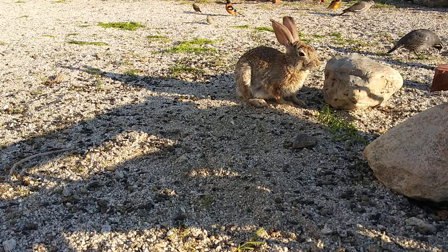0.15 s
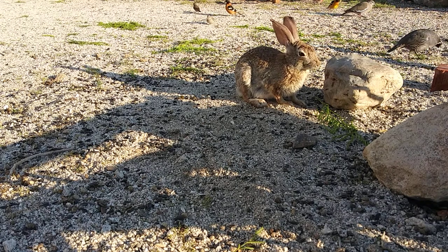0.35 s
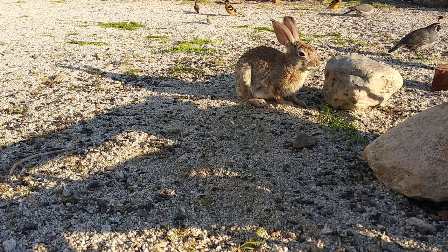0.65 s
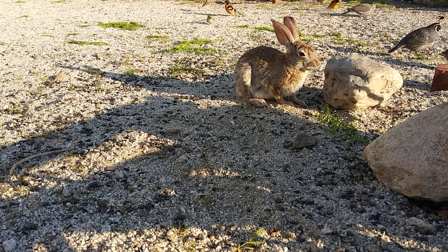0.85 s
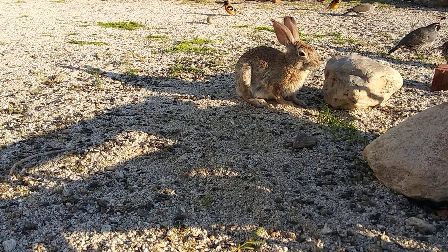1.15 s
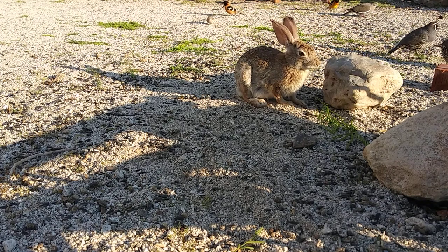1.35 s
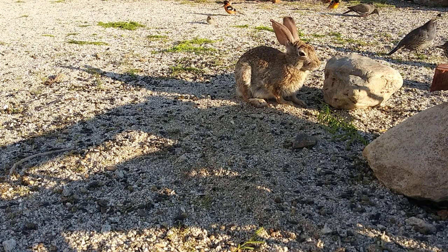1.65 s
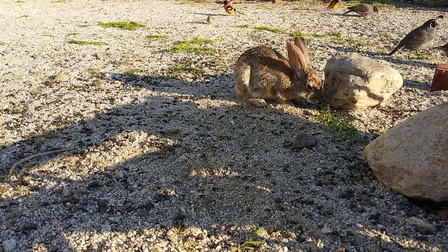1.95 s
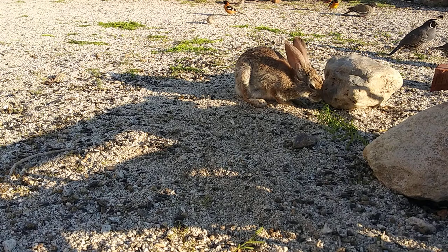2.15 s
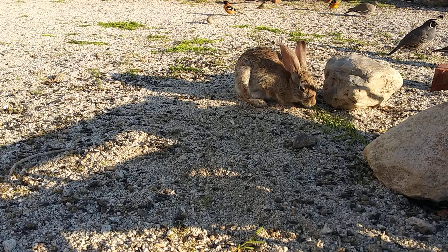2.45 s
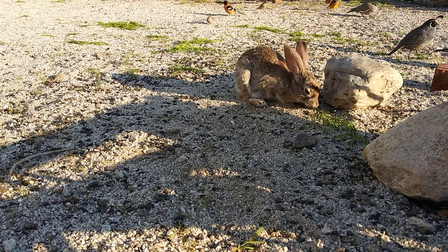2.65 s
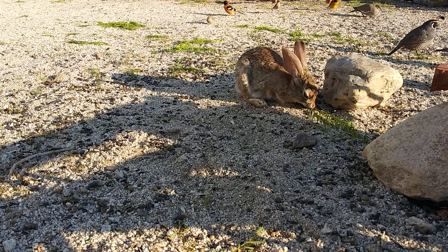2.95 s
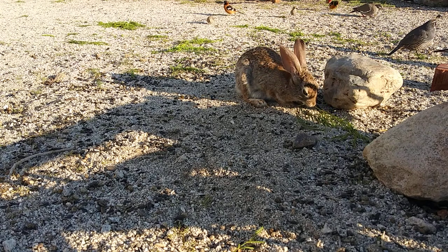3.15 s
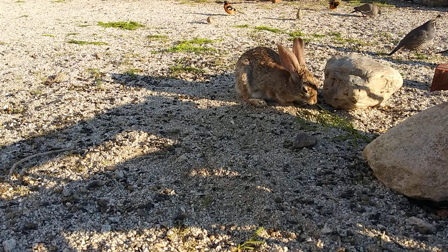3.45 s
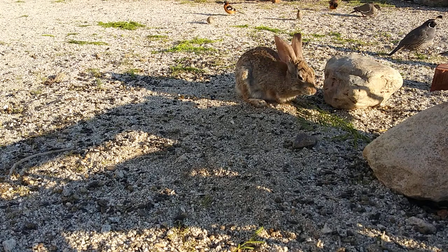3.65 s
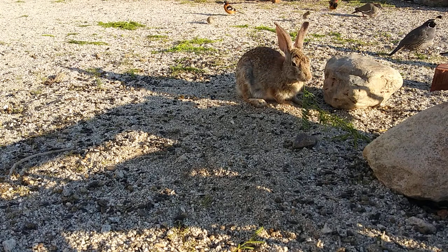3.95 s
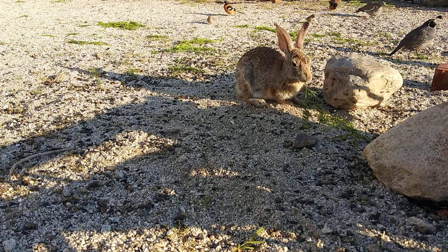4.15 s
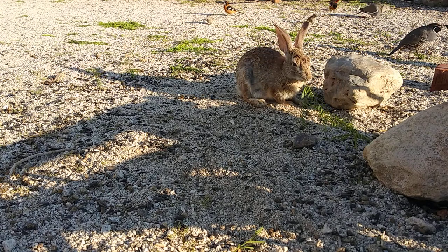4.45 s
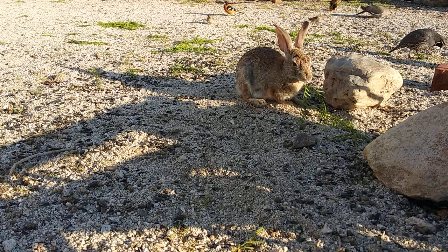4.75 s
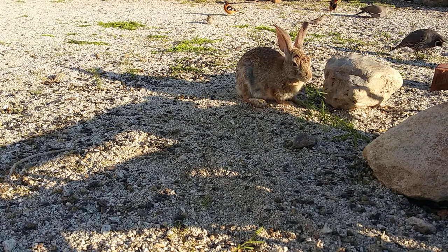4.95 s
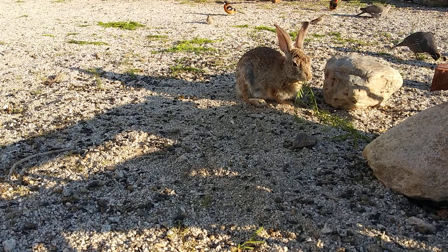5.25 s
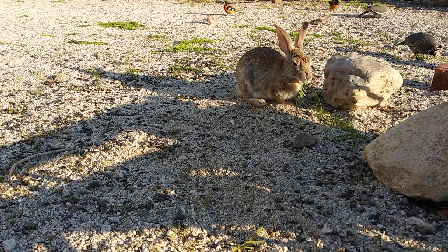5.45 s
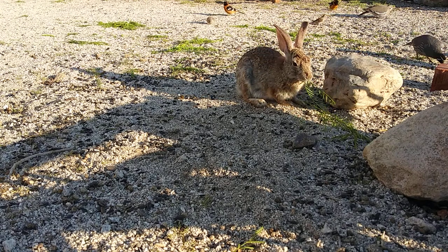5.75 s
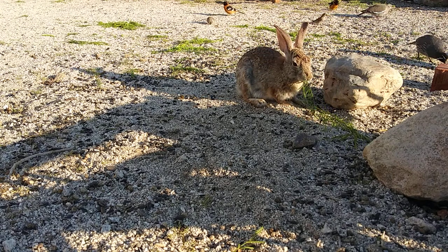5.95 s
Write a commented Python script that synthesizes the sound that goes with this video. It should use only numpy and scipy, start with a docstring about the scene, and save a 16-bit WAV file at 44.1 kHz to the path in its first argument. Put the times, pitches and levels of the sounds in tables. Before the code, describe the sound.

Hoarse, breathy quail whistles over light air rumble give way to soft distant calls, crisp beak cracks and two loud hollow hoots.

```python
"""Quail call in a gravel backyard, over a quiet floor with a faint hum; small birds chirp and beaks crack seeds.
First a hoarse bird whistles gliding notes that choke into hiss, while light air rumbles and dies down.
From about two seconds softer notes come from farther off, among chirps, thin whistles and cracks.
Then a loud bird calls twice; a wall throws its notes back, so each glide beats against its own echo.
Right after its second call another quail answers, softer. Voices are harmonics of a pitch arch; the rest is noise."""
import sys
import numpy as np
from scipy import signal
from scipy.fft import rfft, irfft, next_fast_len
from scipy.io import wavfile

SR = 44100
rng = np.random.default_rng(int(sys.argv[2]) if len(sys.argv) > 2 else 0)


def store_wav(level_fs):
    """Save 16-bit WAV to argv[1]."""
    pcm = np.round(np.clip(np.atleast_2d(level_fs), -1, 1) * 32767)
    wavfile.write(sys.argv[1], SR, pcm.T.astype(np.int16))


N = 269002  # length in samples
TIME = np.arange(N) / SR
EDGE_HZ = 16300  # upper band limit
FOOT_HZ = 439.4  # where the arches of the clear quail voices start and end


def amp(db):
    """Decibels to gain."""
    return 10 ** (np.asarray(db) / 20)


def unit(x):
    """Scales to rms 1."""
    return x / np.sqrt(np.mean(x ** 2) + 1e-20)


def read(points, hz):
    """A spectrum's gain, joined by straight lines on a log-frequency axis."""
    point_hz, point_db = np.transpose(points)
    return amp(np.interp(np.log(hz + 1), np.log(point_hz), point_db))


def add(mix, start_s, sound):
    """Mixes a sound in at a given time, trimming what falls outside."""
    at = round(start_s * SR)
    part, sound = mix[max(at, 0):], sound[max(-at, 0):]
    part[:len(sound)] += sound[:len(part)]


def noise(colour, size):
    """Noise of rms 1 with the given spectrum."""
    n = next_fast_len(size, True)
    spectrum = rfft(rng.standard_normal(n)) * read(colour, np.fft.rfftfreq(n, 1 / SR))
    return unit(irfft(spectrum, n)[:size])


def band(hz, width_hz, size):
    """Noise of rms 1 in a bell-shaped band; around 0 Hz it is a slow random drift."""
    n = next_fast_len(size, True)
    bell = np.exp(-.5 * ((np.fft.rfftfreq(n, 1 / SR) - hz) / width_hz) ** 2)
    return unit(irfft(rfft(rng.standard_normal(n)) * bell, n)[:size])


def echo(x, delay_s, strength):
    """The sound plus one reflection: a delay is a turn of phase that grows with frequency."""
    size = next_fast_len(len(x) + SR // 20)
    turn = np.exp(-2j * np.pi * np.fft.rfftfreq(size, 1 / SR) * delay_s)
    return irfft(rfft(x, size) * (1 + strength * turn), size)


def yard(x, wet_db, t60):
    """Weak scattered reflections from rocks, fence and shrubs: noise that fades 60 dB in t60 seconds."""
    t = np.arange(SR // 2) / SR
    tail = rng.standard_normal(len(t)) * amp(-60 * t / t60) * (t > .005)
    return x + amp(wet_db) * signal.fftconvolve(x, tail / np.linalg.norm(tail))[:N]


def arch(foot_hz, top_s, rise_s, fall_s, top_hz, rise_shape=1, fall_shape=1, crown=0):
    """Pitch lifts from its foot to a top and sinks back. Gives start, pitch and lift (0-1)."""
    t = np.arange(-rise_s, fall_s, 1 / SR)
    away = np.where(t < 0, -t / rise_s, t / fall_s)
    # shape 1 is a bell, less is pointed, more is flat-topped
    lift = np.cos(np.pi / 2 * away ** np.where(t < 0, rise_shape, fall_shape)) ** 2
    # a crown rounds a flat top
    lift *= 1 - np.clip(crown, 0, 1) * away * np.sqrt(away)
    return top_s - rise_s, foot_hz + (top_hz - foot_hz) * lift, lift


def note(hz, db, throat, jitter, shimmer, edge_power=1, flutter_db=5.3, overtone_db=0,
         air=None, air_db=-70, air_power=3, count=14):
    """Harmonics of a gliding pitch sweep through a fixed throat; straining for the top adds roughness and edge."""
    t = np.arange(len(hz)) / SR
    strain = hz / hz.max()
    rough_hz = hz * (1 + jitter * strain ** 3 * band(0, 216, len(t)))
    turns = np.cumsum(rough_hz) / SR
    tone = np.zeros(len(t))
    for k in range(1, count):
        gain = amp(overtone_db * (k > 1)) * read(throat, k * hz) * (k * hz < EDGE_HZ)
        # the upper partials come and go with the strain, and flutter
        if k > 4:
            gain = gain * strain ** edge_power * amp(flutter_db * band(0, 46, len(t)))
        tone += gain * np.cos(2 * np.pi * k * turns)
    tone *= amp(db) * (1 + shimmer * band(0, 120, len(t)))
    if air:
        # breath hiss, also strongest at the top
        tone += amp(air_db) * strain ** air_power * noise(air, len(t))
    return tone * np.clip(np.minimum(t, t[-1] - t) / 0.0058, 0, 1)


# Colour of the quiet floor: pitch_hz, relative level_db
FLOOR_COLOUR = [(24, -57), (40, -18), (87, -13), (101, -24), (124, -9), (151, -8.5), (297, -6.5),
                (570, -12.5), (733, -15), (3380, -21), (6020, -26.5), (8340, -19.5), (16000, -25)]
FLOOR_DB = -67.5
HUM_HZ, HUM_DB, HUM_WAVER = 120, -81, 1.3  # waver: narrow noise around the hum, relative to it


def background():
    """A steady floor of coloured noise and a far-off hum, a pure tone that wavers with narrow noise around it."""
    hum = unit(np.sin(2 * np.pi * HUM_HZ * TIME)) + HUM_WAVER * band(HUM_HZ, 7.5, N)
    return amp(FLOOR_DB) * noise(FLOOR_COLOUR, N) + amp(HUM_DB) * hum


# How the rumble of the light air rises and falls: time_s, level_db
BREEZE_LEVEL = [(0, -67.5), (.35, -71.5), (.55, -69.5), (.75, -68.5), (1.0, -70), (1.15, -75.5),
                (1.65, -78), (1.9, -99)]
# Colour of that rumble: pitch_hz, relative level_db
RUMBLE_COLOUR = [(20, -30), (45, -14), (70, -9), (120, -17.5), (200, -22.5), (400, -42)]
# Low bumps of air on the microphone: start_s, level_db, pitch_hz
AIR_BUMPS = [(0.025, -50, 88), (.058, -55, 80), (0.27, -39.5, 131), (.309, -37.5, 99), (0.463, -45, 73),
             (0.674, -52.5, 90), (0.866, -39.5, 91), (0.954, -51.5, 91.5), (5.86, -62, 90.5)]


def breeze():
    """Light air rumbles on the microphone and dies down; each puff is a quickly damped low swing."""
    time_s, rumble_db = np.transpose(BREEZE_LEVEL)
    out = amp(np.interp(TIME, time_s, rumble_db, right=-110)) * noise(RUMBLE_COLOUR, N)
    t = np.arange(SR // 10) / SR
    swell = t / 0.0045 * np.exp(1 - t / 0.0036)
    for start_s, level_db, hz in AIR_BUMPS:
        add(out, start_s, amp(level_db) * swell * np.sin(2 * np.pi * hz * t))
    return out


# Colour of ticks and cracks, with the microphone's bright peak near 8900 Hz: pitch_hz, relative level_db
CLICK_COLOUR = [(300, -30), (1500, -41), (3200, -35), (4700, -31.5), (6000, -21.5), (7000, -26),
                (8000, -0.5), (8900, 6), (10500, -7), (13000, -11), (16000, -36)]


def gravel(per_s=14, peak_db=-60, spread_db=3):
    """Faint ticks of feet and beaks among the stones: random single clicks, the stronger ones rarer."""
    chance = rng.random(N)
    size = np.minimum(rng.exponential(1, N), 3)
    ticks = (chance < per_s / SR) * amp(peak_db + spread_db * size)
    n = next_fast_len(N, True)
    colour = read(CLICK_COLOUR, np.fft.rfftfreq(n, 1 / SR))
    return irfft(rfft(ticks, n) * colour / colour.mean(), n)[:N]


# Beaks cracking seeds: start_s, level_db (peak before the echoes), peak_hz (the bright peak),
# tilt in dB per octave above the bright peak, knock_db (the dull knock below it)
SEED_CRACKS = [(0.0713, -46, 8750, 2, 2), (0.5236, -24, 9100, 15.5, 16), (0.99, -40, 8850, -6, 15),
               (2.746, -41.5, 8100, 10, 6), (2.8096, -35.5, 8900, 12, 10), (2.9258, -26, 8320, 13, 18),
               (3.0184, -11.5, 9040, 6, 1.5), (3.1232, -46, 8870, -3, 0), (3.3110, -39.5, 8200, 12, 9),
               (3.436, -50, 9000, 0, 0), (3.6735, -35.5, 9300, 13, 5), (4.1432, -28.5, 9600, -12, 0),
               (4.1856, -38, 8500, 11, 7), (4.4342, -49, 9000, 0, 0), (4.6749, -32.5, 9000, 0, 15.5),
               (4.7142, -32.5, 8900, -10, 12), (4.734, -28, 8800, 15, 16.5), (5.0342, -26, 8600, -5, 3),
               (5.2688, -20, 9100, 1, 0), (5.444, -43, 8250, 7, 14), (5.8703, -37, 8400, -8, 10)]
SCUFF_HZ, SCUFF_DB, SCUFF_S = 1400, -47, 0.013  # dull scuff: centre, level relative to the crack, fade time


def seeds(size=2048):
    """Each husk snaps once and sheds a few splinters; the ground and the wall repeat the snap."""
    out = np.zeros(N)
    t, f = np.arange(size) / SR, np.fft.rfftfreq(size, 1 / SR)
    lead = size // 8  # samples of room before the snap
    for start_s, level_db, peak_hz, tilt_db, knock_db in SEED_CRACKS:
        crunch = 0.064 * np.exp(-t / 0.00063) + 0.023 * np.exp(-t / 0.0015) + 0.0046 * np.exp(-t / 0.0091)
        splinters = 0.06 * np.exp(-t / 0.023) * (rng.random(size) < 300 / SR)
        snap = (t == 0) + (crunch + splinters) * rng.standard_normal(size)

        tilt = tilt_db * np.log2(np.maximum(f / peak_hz, 1))
        knock = knock_db * np.interp(f / peak_hz, [.75, .92], [1, 0])
        colour = read(CLICK_COLOUR, f * 8900 / peak_hz) * amp(tilt + knock)
        crack = irfft(rfft(np.roll(snap, lead)) * colour)
        crack /= abs(crack).max()
        from_ground = echo(crack, 0.0009, 0.062)
        from_wall = echo(from_ground, 0.015, 0.14)
        add(out, start_s - lead / SR, amp(level_db) * from_wall)

        scuff = np.exp(-t / SCUFF_S) * band(SCUFF_HZ, 680, size)
        add(out, start_s, amp(level_db + SCUFF_DB) * scuff)
    return out


# Throat of the small birds: pitch_hz, gain_db
SMALL_THROAT = [(3000, -5.5), (4200, -1), (6000, -8.5), (7200, -13), (8200, -1.5), (11000, -9.5),
                (13000, -13), (16000, -21)]
# Twisting chirps: swing_start_s, swing_period_s, top_hz, dip in octaves, sag in octaves per swing,
# level_db, overtone_db
TWISTING_CHIRPS = [(1.574, 0.05, 4120, .45, .16, -57, 1.5), (2.525, 0.048, 3550, .7, 0.36, -60.5, -21)]
CHIRP_LEAD, CHIRP_SWINGS = .5, 1.22  # periods held before the swing, periods swung
CHIRP_FADE_DB = -1  # change of level at the ends
# Thin distant whistles: top_s, rise_s, fall_s, top_hz, bend_hz, level_db
THIN_WHISTLES = [(1.638, 0.011, 0.019, 4150, 200, -66), (2.1, .07, .15, 3600, 728, -74),
                 (2.25, .05, .17, 2890, 130, -74), (2.06, .16, .05, 8250, 150, -80),
                 (2.13, .03, .14, 8800, 375, -75), (2.35, 0.059, .1, 8560, 180, -73),
                 (2.952, 0.021, .018, 2940, 330, -72), (3.125, .018, .018, 2830, 120, -72),
                 (3.35, 0.023, 0.02, 2940, 130, -70), (3.9, .17, .05, 8400, 392, -74),
                 (4.11, 0.02, .022, 2940, 130, -67), (4.295, 0.014, 0.044, 7300, 200, -65),
                 (4.582, 0.02, .014, 3010, 297, -67), (5.59, .03, 0.041, 4190, 340, -63.5),
                 (5.675, 0.046, 0.064, 3970, 298, -65.5), (5.926, 0.051, 0.06, 4190, 60, -66.5),
                 (6.076, 0.053, 0.08, 4130, 30, -63.5)]
WHISTLE_FADE_DB = -6.5  # change of level at the ends
# Short raspy chips: start_s, length_s, centre_hz, level_db (rms over the whole chip, fades included)
RASPY_CHIPS = [(0.431, 0.04, 4300, -69), (0.644, 0.048, 4600, -67), (0.866, 0.058, 5060, -70),
               (0.945, 0.027, 5040, -67), (3.332, 0.041, 5450, -72), (4.552, 0.054, 4530, -69),
               (5.584, .025, 4400, -65), (5.917, 0.044, 4780, -63)]


def small_birds():
    """Chirps swing in pitch and echo, whistles are single bent tones, and chips are short bands of noise."""
    out = np.zeros(N)
    for swing_s, period_s, top_hz, dip, sag, level_db, overtone_db in TWISTING_CHIRPS:
        swing = np.maximum(np.arange(-CHIRP_LEAD, CHIRP_SWINGS, 1 / (period_s * SR)), 0)
        hz = top_hz * 2 ** (-dip * np.sin(np.pi * swing) ** 2 - sag * swing)
        db = level_db + CHIRP_FADE_DB * np.linspace(-1, 1, len(hz)) ** 2
        chirp = note(hz, db, SMALL_THROAT, jitter=0.019, shimmer=0.46, overtone_db=overtone_db, count=5)
        add(out, swing_s - CHIRP_LEAD * period_s, echo(chirp, .012, 0.25))
    for top_s, rise_s, fall_s, top_hz, bend_hz, level_db in THIN_WHISTLES:
        start_s, hz, lift = arch(top_hz - bend_hz, top_s, rise_s, fall_s, top_hz)
        db = level_db + WHISTLE_FADE_DB * (1 - lift)
        add(out, start_s, note(hz, db, SMALL_THROAT, jitter=0.0032, shimmer=0.38, count=2))
    for start_s, length_s, hz, level_db in RASPY_CHIPS:
        size = int(length_s * SR)
        rasp = band(hz, 750, size) + 1.02 * band(hz * 1.75, 800, size)
        add(out, start_s, amp(level_db) * unit(rasp * np.hanning(size)))
    return out


# Throat of the distant quail: pitch_hz, gain_db
COVEY_THROAT = [(400, 4.5), (1000, -9), (1300, -23), (1600, -20), (1950, -10.5), (2400, -25), (2900, -20.5),
                (4000, -13), (5000, -26), (5800, -12.5), (7000, -36)]
# Soft notes of the covey: top_s, rise_s, fall_s, top_hz, rise_shape, fall_shape, level_db at the top
COVEY_NOTES = [(1.959, 0.016, .052, 606, 0.81, 0.85, -65.5), (3.64, 0.29, 0.11, 736, 1.25, 1.04, -65.5),
               (4.304, 0.047, .045, 695, 1.48, 2.2, -64), (4.71, 0.35, 0.13, 985, 0.94, 2, -57),
               (5.001, 0.049, 0.12, 910, 0.91, 0.84, -56.5), (5.451, .061, 0.042, 947, 1.1, 1.14, -52),
               (5.755, .215, .05, 1062, 1.2, 3.23, -52.5), (6.019, 0.039, 0.16, 1015, 1.05, 0.7, -54)]
FAR_SWELL_DB = 17  # level gained per octave
# Low clucks: top_s, rise_s, fall_s, top_hz, level_db at the top
LOW_CLUCKS = [(5.244, .02, 0.0277, 425, -63.5), (5.865, 0.013, 0.033, 472, -56.5)]
CLUCK_FOOT, CLUCK_FADE_DB = 0.647, -12  # share of the top pitch, and change of level, at the ends


def covey():
    """Distant arched notes and low clucks, each a few harmonics that swell towards the top of the arch."""
    out = np.zeros(N)
    for *shape, level_db in COVEY_NOTES:
        start_s, hz, _ = arch(FOOT_HZ, *shape)
        db = level_db + FAR_SWELL_DB * np.log2(hz / hz.max())
        call = note(hz, db, COVEY_THROAT, jitter=.0033, shimmer=0.21, overtone_db=-1.5, count=4)
        add(out, start_s, call)
    for top_s, rise_s, fall_s, top_hz, level_db in LOW_CLUCKS:
        start_s, hz, lift = arch(CLUCK_FOOT * top_hz, top_s, rise_s, fall_s, top_hz)
        db = level_db + CLUCK_FADE_DB * (1 - lift)
        cluck = note(hz, db, COVEY_THROAT, jitter=.004, shimmer=0.39, overtone_db=-1, count=4)
        add(out, start_s, cluck)
    return out


# The one answering note: top_s, rise_s, fall_s, top_hz, rise_shape, fall_shape
ANSWER_NOTE = (5.903, .119, .289, 985, 1.97, 1.22)
# Throat of the answering bird: pitch_hz, gain_db
ANSWERING_THROAT = [(600, -27), (1000, -16.5), (1500, -16), (1950, 0), (2300, -7.5), (3000, -24),
                    (4200, -35), (5500, -22), (7000, -40), (9000, -25.5)]
ANSWER_DB, ANSWER_SWELL_DB = -49, 24  # level at the top, level gained per octave


def answering_quail():
    """One softer note whose voice swells with its pitch, so it is loudest at its top."""
    out = np.zeros(N)
    start_s, hz, _ = arch(FOOT_HZ, *ANSWER_NOTE)
    db = ANSWER_DB + ANSWER_SWELL_DB * np.log2(hz / hz.max())
    call = note(hz, db, ANSWERING_THROAT, jitter=0.0032, shimmer=0.19, edge_power=3, flutter_db=6, count=7)
    add(out, start_s, call)
    return out


# The hoarse bird says short, long, falling, twice, with a low note between: top_s, rise_s, fall_s, top_hz,
# rise_shape, fall_shape, level_db at the break pitch before choking, hiss_db at the top, cut_s off the end
HOARSE_CALLS = [(.008, .04, 0.061, 1057, 1.04, 0.93, -40, -54.5, 0),
                (.27, 0.2, .118, 1270, 0.93, 1.65, -42.5, -62.5, .008),
                (.541, 0.034, .3, 1087, 1.03, 0.7, -40.5, -67.5, 0.096),
                (.782, .035, .02, 629, 1.01, 2, -46.5, -82, 0.0059),
                (1.196, 0.038, 0.045, 1051, 1.32, 0.85, -40.5, -58.5, 0),
                (1.452, .215, .124, 1230, .75, 1.6, -43, -63, 0.0068),
                (1.727, .038, 0.26, 1098, 0.91, 0.56, -44.5, -68, 0.082)]
# Its throat: pitch_hz, gain_db
HOARSE_VOICE = [(500, -4), (800, -10.5), (1050, -7), (1300, -5.5), (1600, 1.5), (1850, 2.5), (2050, -10),
                (2300, -11), (3100, -26), (4300, -43), (5700, -11.5), (6800, -40), (8000, -12.5),
                (9500, -32.5)]
# The air hissing through it: pitch_hz, relative level_db
HOARSE_HISS = [(100, -45), (500, -4), (1200, -12), (2200, -5), (3000, -8), (4600, -18.5), (5700, 9),
               (6800, -10), (8000, 3.5), (9200, -21), (15000, -26)]
HOARSE_FOOT_HZ, HOARSE_SWELL_DB = 523.3, 21.5  # where its arches start and end; level gained per octave
BREAK_HZ, BREAK_WIDTH_HZ, BREAK_DB = 1043, 50, -14.5  # above this pitch the voice chokes
RASP_HZ, RASP_WIDTH_HZ, RASP_DB = 2070, 330, -24  # noise of the choked voice, relative to level_db
HOARSE_TIRE_DB = -3.5  # the fall is softer than the rise
HOARSE_RELEASE_S = 0.0092


def hoarse_quail():
    """The voice swells as it climbs, chokes into hiss above its break, and tires on the way down."""
    out = np.zeros(N)
    for *shape, level_db, hiss_db, cut_s in HOARSE_CALLS:
        start_s, hz, _ = arch(HOARSE_FOOT_HZ, *shape)
        t = np.arange(len(hz)) / SR
        choke = .5 + .5 * np.tanh((hz - BREAK_HZ) / BREAK_WIDTH_HZ)
        falling = t > t[hz.argmax()]
        swell_db = HOARSE_SWELL_DB * np.log2(hz / BREAK_HZ)
        db = level_db + swell_db + BREAK_DB * choke + HOARSE_TIRE_DB * falling
        call = note(hz, db, HOARSE_VOICE, jitter=0.0262, shimmer=.27, edge_power=1.3, flutter_db=4.5,
                    air=HOARSE_HISS, air_db=hiss_db, air_power=4.2)
        call += amp(level_db + RASP_DB) * choke * band(RASP_HZ, RASP_WIDTH_HZ, len(t))
        release = np.clip((t[-1] - cut_s - t) / HOARSE_RELEASE_S, 0, 1)
        add(out, start_s, call * release)
    return out


# The loud bird: top_s, rise_s, fall_s, top_hz, rise_shape, fall_shape, crown (share),
# level_db added to LOUD_DB, wall echo delay_s, echo strength (share)
LOUD_CALLS = [(3.6265, .162, .175, 1024.9, 2.9, 2.12, .12, -2, .01562, .86),
              (5.5834, .177, .185, 1044, 2.75, 3.03, .17, 0, .01517, .8)]
# Its throat: pitch_hz, gain_db
LOUD_VOICE = [(500, -7), (1050, -17.5), (1300, -12), (1600, -2.5), (1850, -1.5), (2050, 3), (2300, -4.5),
              (2600, -23.5), (3100, -35), (4100, -41.5), (5150, -28), (6200, -31), (8200, -33.5),
              (10000, -46)]
# The air hissing through it: pitch_hz, relative level_db
LOUD_HISS = [(100, -24), (500, 10), (2000, -4.5), (3500, -0.5), (6000, -4), (7000, -11), (8700, 4.5),
             (11000, -5), (16000, -6.5)]
LOUD_DB = -36.5
LOUD_FADE_DB, LOUD_FADE_POWER = -33.5, 1.41  # change of level at the foot; a higher power holds the level longer


def loud_quail():
    """Clear flat-topped notes; the pitch glides on while the wall's echo arrives late, so the two beat."""
    out = np.zeros(N)
    for *shape, level_db, delay_s, strength in LOUD_CALLS:
        start_s, hz, lift = arch(FOOT_HZ, *shape)
        db = LOUD_DB + level_db + LOUD_FADE_DB * (1 - lift) ** LOUD_FADE_POWER
        call = note(hz, db, LOUD_VOICE, jitter=.00098, shimmer=.018, edge_power=2.5, flutter_db=5.0,
                    air=LOUD_HISS, air_db=-66, air_power=1.3, count=9)
        add(out, start_s, echo(call, delay_s, strength))
    return out


def scene():
    """All sources at one microphone; birds and feeding also get the yard's reflections."""
    quail = covey() + answering_quail() + hoarse_quail() + loud_quail()
    birds = yard(quail, wet_db=-20, t60=0.34) + yard(small_birds(), wet_db=-7.5, t60=0.21)
    feeding = yard(seeds() + gravel(), wet_db=-26.5, t60=0.17)
    return (birds + feeding + breeze() + background())[None]


def record(dry):
    """The microphone's bass roll-off, below 55 Hz, and the recorder's band limit."""
    bass_cut = signal.butter(3, 55, "highpass", fs=SR, output="sos")
    thin = signal.sosfilt(bass_cut, dry)
    band_limit = signal.firwin(511, EDGE_HZ, window=("kaiser", 9), fs=SR)
    return signal.oaconvolve(thin, band_limit[None], "same")


dry = scene()
out = record(dry)
store_wav(out)
```